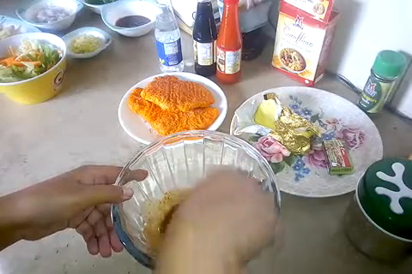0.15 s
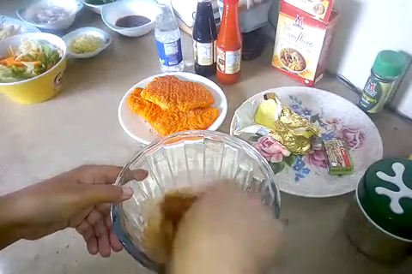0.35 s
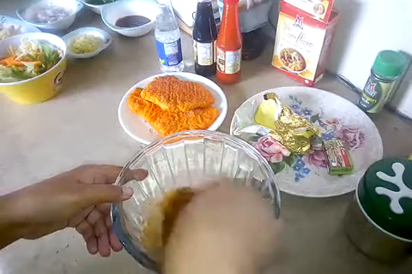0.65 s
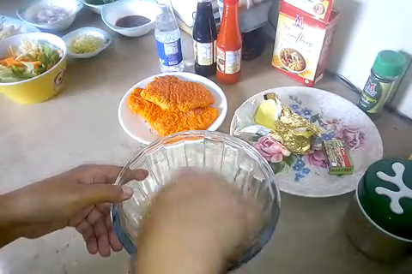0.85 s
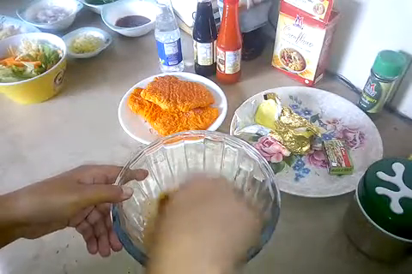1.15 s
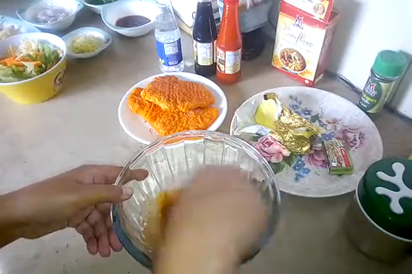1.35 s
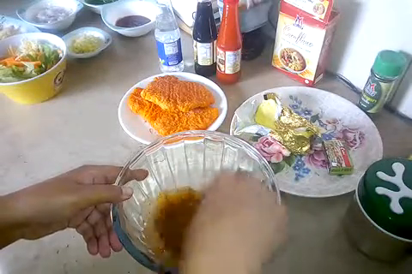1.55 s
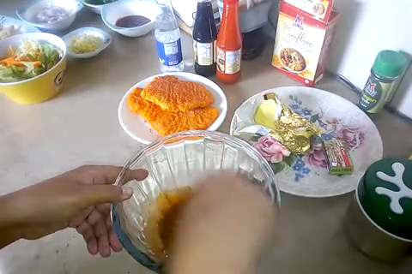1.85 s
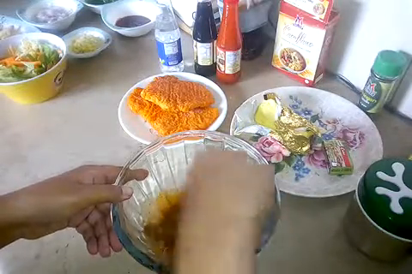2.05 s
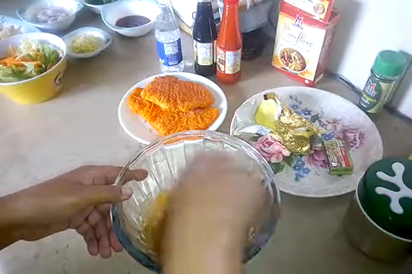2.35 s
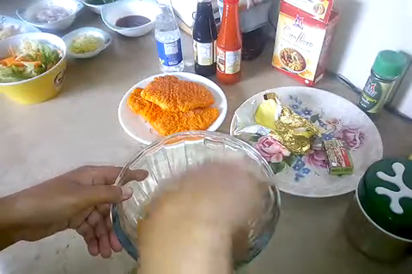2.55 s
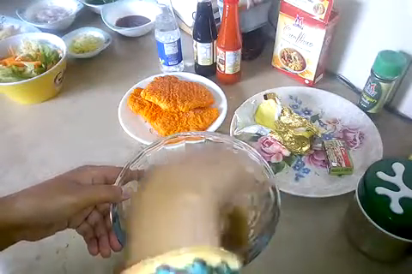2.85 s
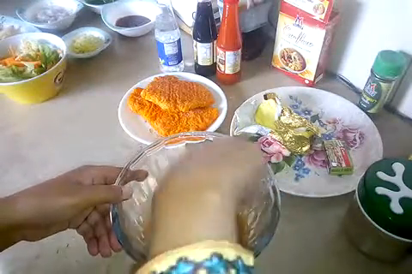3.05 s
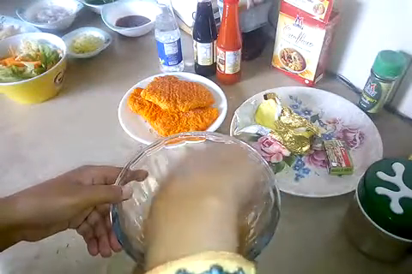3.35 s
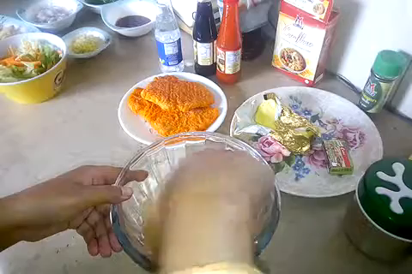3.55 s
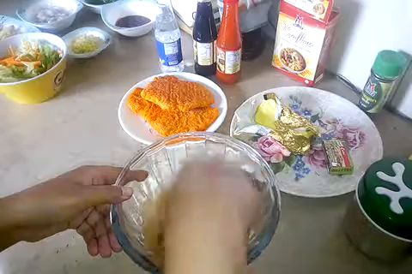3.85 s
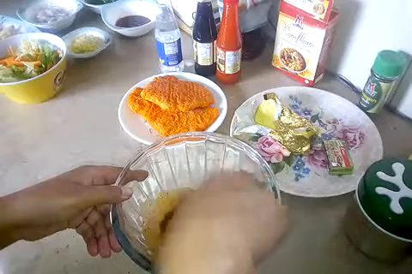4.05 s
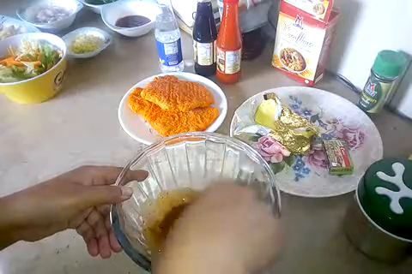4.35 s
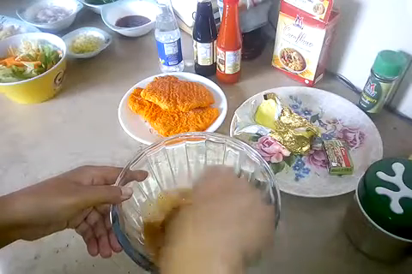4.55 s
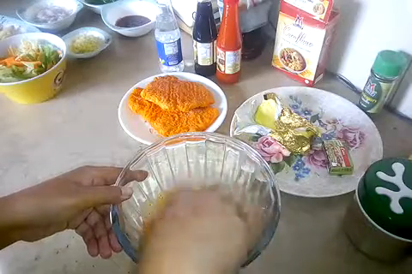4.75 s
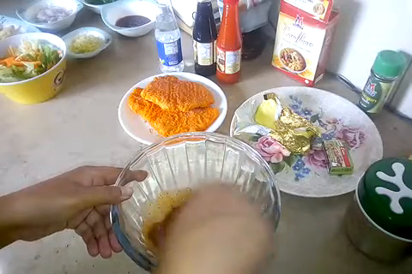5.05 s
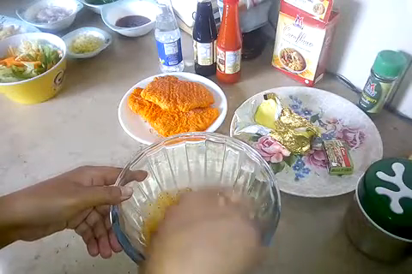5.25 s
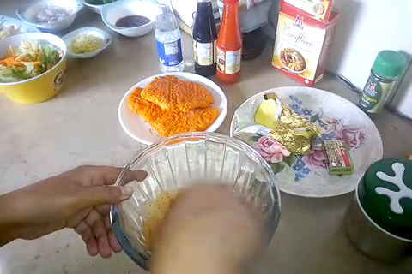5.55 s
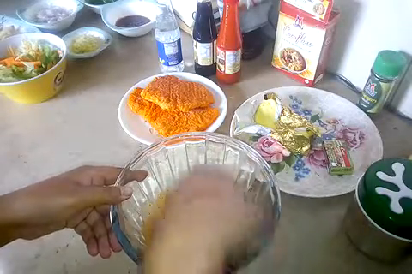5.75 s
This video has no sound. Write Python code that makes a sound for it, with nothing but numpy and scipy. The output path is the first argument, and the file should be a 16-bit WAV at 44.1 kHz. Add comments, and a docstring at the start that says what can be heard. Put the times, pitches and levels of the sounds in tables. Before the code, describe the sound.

Quick raspy scrapes and bright knocks of a spoon in a heavy glass bowl, the bowl bumping softly on a table indoors.

```python
"""Stirring paste in a glass bowl

A spoon stirs a thick paste in a ribbed glass bowl that a hand holds down on a kitchen table.
Gritty slips in quick strokes and pushes from knocks and a run over the ribs drive the bowl's modes.
Shaped noise makes the table's thuds, the hard contact sound and the steady air.
Dense decaying echoes make the small hard room ring on after each knock."""
import sys
import numpy as np
from scipy import signal
from scipy.fft import rfft, irfft
from scipy.io import wavfile

SR = 44100
rng = np.random.default_rng(int(sys.argv[2]) if len(sys.argv) > 2 else 0)


def generate_wav(sig):
    """Save sig (samples, or channels by samples) to the path in sys.argv[1] as 16-bit PCM at SR."""
    pcm = np.round(np.clip(np.atleast_2d(sig).T, -1, 1) * 32767).astype(np.int16)
    wavfile.write(sys.argv[1], SR, pcm)


N = 260190
TIME_S = np.arange(N) / SR
BODY_TOP_HZ, WALL_TOP_HZ = 2000, 7700   # the bowl sounds in three zones: body, wall and, above them, edge


def from_db(db):
    """Gain of a level in dB."""
    return np.exp(np.log(10) / 20 * np.asarray(db))


def rms_one(x):
    """Scaled to rms 1."""
    return x / np.sqrt(np.mean(x ** 2) + 1e-20)


def at_hz(points, hz):
    """Reads a (Hz, value) table on a log-frequency axis."""
    table_hz, values = np.transpose(points)
    return np.interp(np.log(hz), np.log(table_hz), values)


def bin_hz():
    """Frequencies of the spectrum, kept off zero for the log axis."""
    return np.fft.rfftfreq(N, 1 / SR) + 1


def filtered(x, kind, hz):
    """Second-order Butterworth filter."""
    return signal.sosfilt(signal.butter(2, hz, kind, fs=SR, output="sos"), x)


def drift(rate_hz):
    """Slow random wander of spread 1, drawn at every 32nd sample."""
    pole = np.exp(-64 * np.pi * rate_hz / SR)
    white = rng.standard_normal(N // 32 + 502)
    slow = signal.lfilter([1], [1, -2 * pole, pole * pole], white)[500:]   # skip the settling
    return np.interp(np.arange(N) / 32, np.arange(len(slow)), rms_one(slow))


def colour(x, spectrum):
    """Shapes a pair of signals by a spectrum in dB; white input of rms 1 keeps rms 1."""
    gain = from_db(at_hz(spectrum, bin_hz()))
    return irfft(rfft(x) * rms_one(gain), N)


# Stereo likeness of left and right, 1 same to -1 opposite: pitch_hz, likeness
STEREO_LIKENESS = [(60, 0.45), (150, 0.92), (300, 0.31), (600, 0.39), (1100, 0.35), (2200, -0.36),
                   (5000, 0.19), (15000, -0.33)]


def pair(mid, side):
    """Left and right from two unrelated signals, as alike at each pitch as the table says."""
    alike = np.clip(at_hz(STEREO_LIKENESS, bin_hz()), -1, 1)
    m = np.sqrt(.5 + alike / 2) * rfft(mid)
    s = np.sqrt(.5 - alike / 2) * rfft(side)
    return irfft([m + s, m - s], N)


def white_pair():
    """White noise with the stereo likeness of the scene."""
    return pair(*rng.standard_normal((2, N)))


def swells(s, levels_db, rise_s, fall_s):
    """Gain that swells and dies after each moment; powers add."""
    power, up, down = np.zeros(N), np.exp(-2 / (rise_s * SR)), np.exp(-2 / (fall_s * SR))
    power[(s * SR).astype(int)] = from_db(2 * levels_db)
    smooth = signal.lfilter([2 * (1 - up)], np.convolve([1, -up], [1, -down]), power + 1e-18)
    return np.sqrt(np.abs(smooth))


# Tone of the air, relative: pitch_hz, level_db
AIR_TONE = [(20, -12.5), (60, 19.5), (150, -13.5), (400, -8.5), (1500, -3), (2100, -18.5), (5000, 10.5),
            (8000, -9), (16000, -43)]


def air():
    """Steady shaped noise under everything."""
    return colour(white_pair(), AIR_TONE) * from_db(-68.5)


# Echo decay of the kitchen: pitch_hz, t60_s
ROOM_DECAY = [(200, 1), (1000, 0.48), (4000, 0.4), (9000, 0.29), (15000, 0.29)]


def kitchen(x):
    """Dense echoes, partly different on each side, dying band by band."""
    t = np.arange(int(.8 * SR)) / SR
    edges_hz = 100 * 2 ** np.arange(0, 7.6, .5)
    tail, shared = 0, rng.standard_normal(len(t))
    for low, high in zip(edges_hz, edges_hz[1:]):
        hz = np.sqrt(low * high)
        alike = np.clip(at_hz(STEREO_LIKENESS, hz), 0, 1)
        white = np.sqrt(alike) * shared + np.sqrt(1 - alike) * rng.standard_normal((2, len(t)))
        tail = tail + filtered(white, "band", [low, high]) * from_db(-60 * t / at_hz(ROOM_DECAY, hz))
    tail = tail * (1 - np.exp(-t / 0.0029))   # first walls are a metre or two away
    tail = tail / np.sqrt(np.sum(tail ** 2) / 2)
    return signal.fftconvolve(x, tail, axes=1)[:, :N]


# Steady load of the hand between knocks, relative: start_s, table_bass_db, bowl_judder_db
HAND_LOAD = [(0.0, -78, -65), (0.26, -74, -58.5), (0.47, -62.5, -54), (0.95, -68, -69.5), (1.2, -76, -71.5),
             (1.73, -73, -66.5), (2.28, -65.5, -58), (2.51, -67, -47.5), (2.7, -68, -55.5),
             (2.99, -69.5, -62.5), (3.58, -70, -62), (3.88, -68, -49), (4.08, -68.5, -50.5),
             (4.519, -61.5, -56), (4.68, -68, -59.5), (5.36, -74, -61), (5.82, -63, -50.5), (5.9, -55, -60)]


def hand_load():
    """Two gains that glide from point to point: load on the table and judder in the bowl."""
    when, *levels_db = np.transpose(HAND_LOAD)
    return [from_db(np.interp(TIME_S, when, column)) for column in levels_db]


# Tone of the table top, relative: pitch_hz, level_db
TABLE_TONE = [(20, -16), (45, -9), (65, -8), (120, 7), (200, 1), (260, -8.5), (400, 0.5), (600, -7),
              (1100, -75)]
# Bumps of the bowl on the table top, relative: start_s, level_db
TABLE_BUMPS = [(0.26, -57), (0.352, -57.5), (0.46, -56), (0.56, -54), (0.638, -53.5), (0.9, -67),
               (1.109, -56.5), (1.4, -65), (1.58, -78), (2.34, -54), (2.418, -44.5), (2.548, -54),
               (2.718, -59.5), (2.85, -54), (2.93, -59), (3.14, -53), (3.399, -56), (3.53, -54.5),
               (3.719, -52.5), (3.84, -53), (3.978, -50.5), (4.258, -43.5), (4.55, -47.5), (4.858, -62),
               (5.36, -60), (5.58, -55.5), (5.66, -58), (5.87, -58)]


def table_thuds(load):
    """Low noise of the table top, swelling at each bump over the steady load of the hand."""
    bumps = swells(*np.transpose(TABLE_BUMPS), rise_s=0.024, fall_s=0.035)
    flutter = from_db(2.1 * drift(26))
    return colour(white_pair() * (load + bumps) * flutter, TABLE_TONE)


def ring(force, hz, t60):
    """One decaying mode; it reaches left and right with phases set by their likeness."""
    r, w = from_db(-60 / (t60 * SR)), 2 * np.pi * hz / SR
    angle = .5 * np.arccos(np.clip(at_hz(STEREO_LIKENESS, hz), -1, 1))
    turn = angle * rng.choice([-1, 1]) * np.array([[1], [-1]])
    swing = signal.lfilter([1], [1, -2 * r * np.cos(w), r * r], force + 1e-18)
    return np.sin(turn) * swing + r * np.sin(w - turn) * np.append(0, swing[:-1])


def favour(hz, favoured_hz, boost_db, width):
    """Extra drive in dB for modes close to the favoured pitch; width is in log frequency."""
    return boost_db * np.exp(-(np.log(hz / favoured_hz) / width) ** 2)


def grit():
    """Grains and roughness slip under the spoon: dense uneven clicks in clumps."""
    grains_per_s, spread_db, clump_db = 2700, 1, 2.5
    sizes = from_db(spread_db * np.minimum(rng.exponential(1, N), 5)) * rng.choice([-1, 1], N)
    hits = rng.random(N) < grains_per_s / SR
    return rms_one(sizes * hits * from_db(clump_db * drift(32)))


# Scraping strokes, relative level: fastest_s, level_db, half_length_s (to -6 dB), favoured_pitch_hz
SCRAPE_STROKES = [(0.015, -54, 0.0091, 5370), (0.054, -46, 0.024, 5450), (0.2, -48.5, 0.024, 4540),
                  (0.33, -56.5, 0.012, 7000), (0.48, -59, 0.025, 4040), (0.77, -53.5, 0.029, 3990),
                  (0.88, -54, 0.019, 5400), (1.04, -52.5, 0.023, 5160), (1.073, -46.5, 0.015, 3840),
                  (1.182, -49.5, 0.016, 5140), (1.342, -55, 0.027, 4400), (1.458, -47.5, 0.023, 5500),
                  (1.577, -58, 0.0085, 4030), (1.604, -42.5, 0.021, 5300), (1.721, -44, 0.024, 6160),
                  (1.826, -46, 0.01, 6240), (1.857, -42.5, 0.0097, 5230), (1.953, -47.5, 0.013, 5500),
                  (1.991, -40.5, 0.022, 5580), (2.2, -70, 0.0203, 4540), (2.285, -60, 0.022, 5200),
                  (2.78, -48, 0.015, 5560), (4.058, -58.5, 0.026, 5150), (4.259, -46.5, 0.013, 4800),
                  (4.501, -51, 0.024, 5300), (4.655, -44, 0.019, 5270), (4.792, -44, 0.021, 5380),
                  (4.919, -42, 0.025, 5670), (5.04, -42, 0.024, 5560), (5.145, -35, 0.0064, 5170),
                  (5.178, -40, 0.018, 5360), (5.295, -44, 0.024, 5780), (5.46, -55, 0.03, 5100),
                  (5.698, -54, 0.02, 3980), (5.75, -54, 0.019, 4060)]


def strokes():
    """Each stroke swells to its fastest point and fades; gains per zone and the favoured pitch."""
    fade_over_swell, squareness = 1.02, 2.5   # more squareness: flatter top and steeper ends
    edge_db, edge_db_per_octave, usual_hz = -13.5, 18, 5650   # higher-pitched strokes are brighter
    wall, edge = np.zeros(N), np.zeros(N)
    for s, level_db, swell, favoured_hz in SCRAPE_STROKES:
        fade = swell * fade_over_swell
        near = slice(max(0, int((s - 4 * swell) * SR)), int((s + 4 * fade) * SR))
        t = TIME_S[near]
        distance = np.abs((t - s) / np.where(t < s, swell, fade))
        speed = from_db(level_db - 6 * distance ** squareness)
        wall[near] += speed
        edge[near] += speed * from_db(edge_db + edge_db_per_octave * np.log2(favoured_hz / usual_hz))
    body = wall * from_db(-18)
    when, _, _, pitches_hz = np.transpose(SCRAPE_STROKES)
    return body, wall, edge, np.interp(TIME_S, when, pitches_hz)


# Tone of the grit under the tip, relative: pitch_hz, level_db
GRIT_TONE = [(1500, -57.5), (2050, -61), (2350, 1), (3250, -29), (3950, 0.5), (4350, -8), (5350, 5.5),
             (5950, -6.5), (6750, 4), (7600, -16), (9200, -33), (10100, -31), (12000, -24.5), (16000, -19)]
# Modes of the bowl, damped by paste and hand, relative drive: pitch_hz, t60_s, struck_db, scraped_db
BOWL_MODES = [(582, 0.094, -15.5, -50), (648, 0.042, -19, -38), (789, 0.089, -14, -44.5),
              (815, 0.096, -13.5, -41), (820, 0.0057, -12, -54), (1049, 0.055, -10.5, -51),
              (1091, 0.045, -8.5, -47.5), (1278, 0.046, -15.5, -56.5), (1382, 0.11, -15, -55),
              (1465, 0.12, -16, -24.5), (1528.5, 0.075, -13.5, -13), (1602.4, 0.051, -11.5, -18),
              (1770, 0.061, -20, -30), (2315, 0.042, -12.5, -55), (2877, 0.021, -12.5, -36),
              (3528, 0.017, -5.5, -48), (3710, 0.023, -15.5, -31), (4049, 0.043, -13, -27),
              (4524, 0.035, -8.5, -37.5), (4688, 0.022, -8, -40), (4937, 0.017, -5.5, -41),
              (4990, 0.023, -13, -53.5), (5364, 0.024, -12, -31), (5602, 0.019, -9.5, -26),
              (5990, 0.025, -8.5, -32.5), (6393, 0.011, -2.5, -26.5), (6664, 0.031, -8, -34),
              (6924, 0.03, -12, -32), (7420, 0.024, -15.5, -28.5), (8175, 0.036, -4.5, -26.5),
              (8920, 0.014, -2, -27), (10004, 0.015, 3, -19), (11150, 0.028, -4.5, -30),
              (12370, 0.017, -10.5, -54)]


def scraping():
    """Slips under the tip are heard as a rasp and drive the modes of the bowl."""
    body, wall, edge, favoured_hz = strokes()
    slips = grit()
    out = colour(pair(slips, grit()) * wall, GRIT_TONE)
    for hz, t60, _, scraped_db in BOWL_MODES:
        rub = body if hz < BODY_TOP_HZ else wall if hz < WALL_TOP_HZ else edge
        wander_db = 2 * drift(13)   # the contact point wanders over the mode shapes
        near_db = favour(hz, favoured_hz, boost_db=10.5, width=0.037)
        out += ring(slips * rub * from_db(scraped_db + wander_db + near_db), hz, t60)
    return out


# Clear single tones left ringing, relative level: start_s, pitch_hz, level_db, t60_s
RINGING_TONES = [(2.599, 8400, -32, 0.083), (2.604, 3130, -40, .2), (2.89, 623, -33.5, 0.43),
                 (3.282, 4420, -48.5, 0.21), (3.552, 4480, -28.5, 0.094), (4.645, 5380, -42, 0.034),
                 (5.165, 640, -54, 0.66), (5.38, 626, -54, 0.55)]


def pings():
    """Single tones, each started by a soft burst at its own pitch, build up over a few ms."""
    out, soft = 0, np.hanning(256) / 64
    for s, hz, level_db, t60 in RINGING_TONES:
        tap, start = np.zeros(N), int(s * SR)
        burst = soft * np.cos(2 * np.pi * hz / SR * np.arange(len(soft)))
        tap[start:start + len(soft)] = from_db(level_db) * burst
        out = out + ring(tap, hz, t60)
    return out


# Spoon on glass, relative drive: start_s, body_db, wall_db, favoured_body_hz, favoured_wall_hz
SPOON_KNOCKS = [(0.237, -32.5, -33.5, 1430, 2860), (0.343, -21.5, -19.5, 804, 3440),
                (0.461, -34, -41, 837, 4050), (0.474, -27, -57, 765, 4060), (0.527, -23.5, -18, 1100, 5080),
                (0.612, -27, -40, 800, 5460), (0.63, -30.5, -49, 1120, 6250),
                (0.805, -39.5, -52, 1480, 3700), (0.928, -46, -57, 1470, 5710),
                (1.106, -35, -29, 1460, 5370), (1.392, -43, -48.5, 1510, 5200),
                (1.85, -62, -39.5, 1570, 4840), (2.186, -53.5, -53.5, 1520, 4670),
                (2.315, -32.5, -34.5, 1070, 7000), (2.528, -29.5, -31.5, 1150, 6380),
                (2.542, -36.5, -36, 1060, 5950), (2.559, -30, -21.5, 1050, 5150),
                (2.602, -27.5, -25.5, 1640, 8100), (2.654, -38.5, -46, 1084, 5530),
                (2.844, -24.5, -17, 1630, 4600), (2.851, -31, -20, 1430, 4600),
                (2.887, -24, -15.5, 1630, 4500), (2.947, -31, -29, 1040, 4650),
                (3.128, -18, -17, 1020, 6450), (3.271, -33, -46.5, 1040, 6840),
                (3.325, -60, -49, 1060, 4200), (3.398, -23, -23, 980, 6500), (3.514, -23, -22, 1030, 4770),
                (3.546, -29, -27, 820, 4070), (3.71, -24.5, -20.5, 1070, 5300),
                (3.791, -27, -27, 1650, 4500), (3.826, -22, -19.5, 1080, 4400),
                (3.868, -26.5, -31, 1040, 4560), (3.96, -33, -48.5, 1050, 4660),
                (3.986, -32.5, -48, 1010, 3450), (4.002, -47, -46, 1380, 3740),
                (4.058, -42.5, -55, 740, 4470), (4.241, -38, -49, 1040, 3410), (4.269, -21, -20, 990, 4940),
                (4.282, -21.5, -24.5, 990, 6500), (4.302, -26, -43.5, 1040, 4870),
                (4.523, -28.5, -29, 1070, 4920), (4.537, -21.5, -20, 1020, 4440),
                (4.553, -20.5, -27, 970, 4640), (4.586, -32.5, -45, 1060, 4400),
                (4.833, -40, -69.5, 1060, 5250), (4.975, -36.5, -42.5, 1450, 4670),
                (5.092, -31, -32.5, 1080, 6580), (5.363, -45.5, -61, 815, 5500),
                (5.499, -32, -35.5, 1470, 3820), (5.59, -32.5, -40.5, 825, 3500),
                (5.7, -41, -63, 1050, 4000), (5.783, -31.5, -31.5, 1470, 4950),
                (5.856, -37, -43, 1370, 5430)]


def blows():
    """Columns of all knocks and of a rattle over six ribs, its gaps shrinking as the spoon speeds up."""
    start_s, first_gap_s, gap_ratio = 2.336, 0.02, 0.92
    body_db, wall_db, wall_loss_per_rib_db, body_hz, wall_hz = -23, -24, 0.16, 889, 4809
    ribs = []
    for k in range(6):
        s = start_s + first_gap_s * np.sum(gap_ratio ** np.arange(k))
        ribs.append((s, body_db, wall_db - wall_loss_per_rib_db * k, body_hz, wall_hz))
    return np.transpose(list(SPOON_KNOCKS) + ribs)


def jolts():
    """Each knock sets the bowl juddering, more for a stronger body level."""
    s, body_db, *_ = blows()
    hard_jolt_db, hard_body_db, db_per_db = -43, -22, 1
    levels_db = hard_jolt_db + db_per_db * (body_db - hard_body_db)
    return swells(s, levels_db, rise_s=0.029, fall_s=0.046)


def contact(s, levels_db):
    """Force envelope of all knocks: a quick rise and a few ms of chatter, energy 1 at 0 dB."""
    clicks, r = np.zeros(N), np.exp(-1 / (0.0058 * SR))
    clicks[(s * SR).astype(int)] = from_db(levels_db)
    return signal.lfilter([np.sqrt(1 - r * r) * 0.084], np.convolve([1, -r], [1, -.91]), clicks + 1e-18)


def blow(s, levels_db):
    """One clean push per knock within its first 2 ms, on top of the chatter."""
    at = s * SR + rng.uniform(0, .002 * SR, len(s))
    force = contact(s, levels_db) * rng.standard_normal(N)
    force[at.astype(int)] += from_db(levels_db - 1) * rng.choice([-1, 1], len(s))
    return force


# Tone of the contact noise, relative: pitch_hz, level_db
CONTACT_TONE = [(250, -38.5), (500, -21.5), (1040, 10), (3130, 4), (6400, -0.5), (7800, -5), (13300, -11),
                (16000, -58.5)]


def crack(s, wall_db, edge_db):
    """Contact noise of the knocks: it goes with the wall, its top with the edge."""
    white = white_pair()
    top = filtered(white, "high", WALL_TOP_HZ)
    noise = (white - top) * contact(s, wall_db + 13) + top * contact(s, edge_db + 21.5)
    return colour(noise, CONTACT_TONE) * from_db(6.5)


# Knocks high on the bare wall are brighter than those down in the paste: start_s, extra_edge_db
EDGE_BRIGHTNESS = [(0.24, -2.5), (0.34, 2), (0.53, -3.5), (1.1, 2), (2.3, 3.5), (2.41, 2), (2.53, 8.5),
                   (2.9, 4.5), (3.13, -1.5), (3.5, 2), (3.8, 5), (4.27, -0.5), (4.54, -1.5), (4.97, -8),
                   (5.09, 9), (5.5, -17)]


def knocking(rumble):
    """Knocks and judder ring the bowl; where the spoon lands decides which pitches stand out."""
    s, body_db, wall_db, body_hz, wall_hz = blows()
    edge_under_wall_db, hard_knock_db, steepness = -6, -15.5, 1   # softer knocks lose the edge faster
    edge_db = wall_db + edge_under_wall_db + steepness * (wall_db - hard_knock_db)
    edge_db = edge_db + np.interp(s, *np.transpose(EDGE_BRIGHTNESS))
    judder, out = grit() * rumble * from_db(-20.5), pings()
    for hz, t60, struck_db, _ in BOWL_MODES:
        low = hz < BODY_TOP_HZ
        zone_db = body_db if low else wall_db if hz < WALL_TOP_HZ else edge_db
        if low:
            near_db = favour(hz, body_hz, boost_db=7, width=.2)
        else:
            near_db = favour(hz, wall_hz, boost_db=9, width=.06)
        scatter_db = 1.5 * rng.standard_normal(len(s))
        force = blow(s, zone_db + struck_db + near_db + scatter_db)
        out += ring(force + low * judder * from_db(struck_db), hz, t60)
    return out + crack(s, wall_db, edge_db)


def scene():
    """Air, table, and the bowl in its room."""
    load, press = hand_load()
    bowl = scraping() + knocking(press + jolts())
    bowl = bowl + kitchen(bowl) * from_db(-9.5)
    bowl = filtered(bowl, "high", 462)   # a bowl this small radiates no bass
    return air() + table_thuds(load) + bowl


# Stereo balance: pitch_hz, left_minus_right_db
STEREO_BALANCE = [(30, 9.5), (70, 13.5), (130, 8), (260, 9.5), (550, 0.4), (1650, 1.5), (4500, 2.5),
                  (8000, 0), (15000, 1)]


def record(dry):
    """The left side is the stronger, most of all in the bass; bottom and top are cut."""
    half_each = np.array([[.5], [-.5]])
    lean = from_db(at_hz(STEREO_BALANCE, bin_hz()) * half_each)
    x = filtered(irfft(rfft(dry) * lean, N), "high", 52.9)
    return signal.sosfilt(signal.cheby2(12, 70, 16400, fs=SR, output="sos"), x)


dry = scene()
out = record(dry)
generate_wav(out)
```